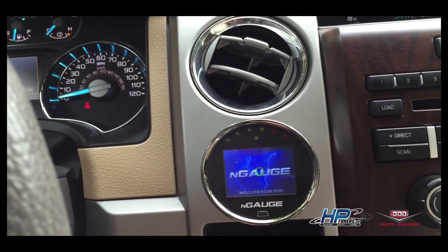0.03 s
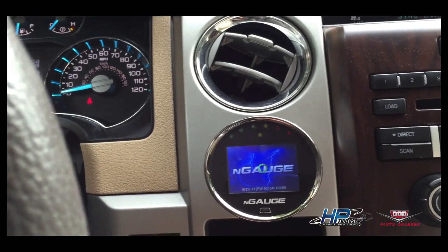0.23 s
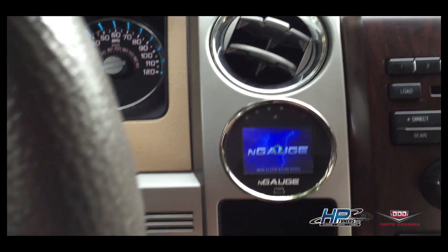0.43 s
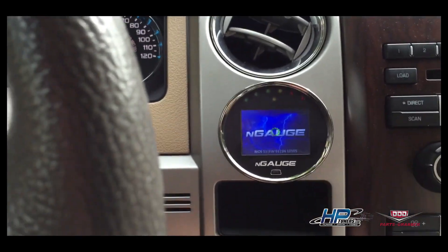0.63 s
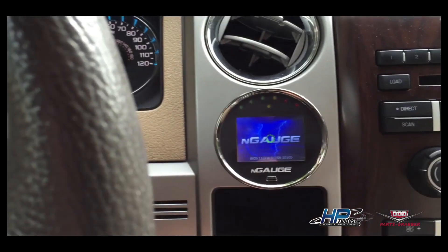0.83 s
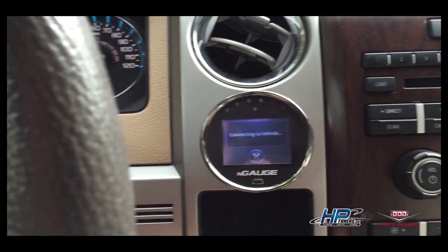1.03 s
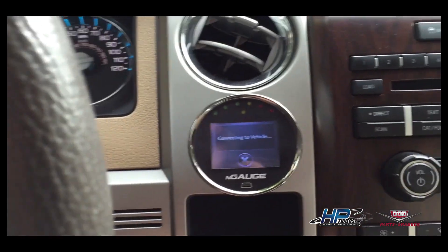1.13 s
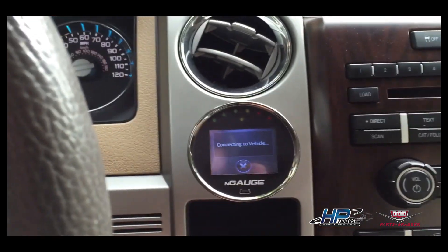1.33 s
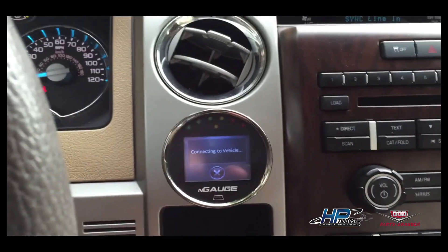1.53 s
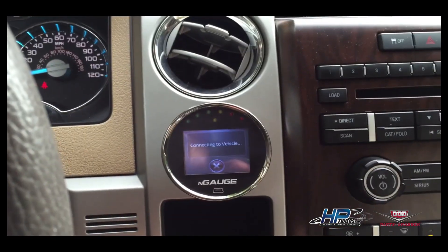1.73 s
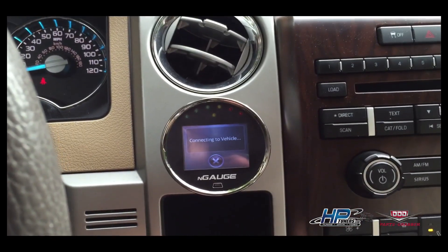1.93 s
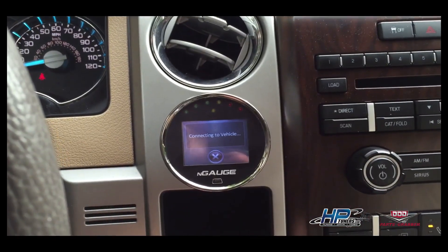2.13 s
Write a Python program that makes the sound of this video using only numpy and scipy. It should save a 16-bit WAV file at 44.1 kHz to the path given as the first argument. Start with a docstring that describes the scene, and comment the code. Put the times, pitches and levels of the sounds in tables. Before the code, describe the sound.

Gusts from a dashboard vent buffet the microphone while an engine rumbles low underneath.

```python
"""Eddies of air from a dash vent thump a microphone in uneven clusters inside a vehicle cabin.
Each passing vortex is a pressure swing of a cycle or two, and streams of smaller ones follow the gusts.
Beneath them the blower hisses and excites the resonances of its ducts, while the idling engine rumbles.
A thin mechanical whirr dies away at the start; a short rustle and a small tick come later."""
import sys
import numpy as np
from scipy import signal
from scipy.fft import rfft, irfft
from scipy.io import wavfile
from scipy.ndimage import uniform_filter1d

SR = 44100
rng = np.random.default_rng(int(sys.argv[2]) if len(sys.argv) > 2 else 0)


def generate_wav(sig):
    """Save sig (samples, or channels by samples) to the path in sys.argv[1] as 16-bit PCM at SR."""
    pcm = np.round(np.clip(np.atleast_2d(sig).T, -1, 1) * 32767).astype(np.int16)
    wavfile.write(sys.argv[1], SR, pcm)


N = 96402

# Air buffets: (time [s], main eddy level [dB], nominal length [ms], pitch [Hz], relative flutter [dB])
AIR_BUFFETS = [(0.017, -14.5, 25.7, 100, -27), (0.036, -26.5, 17.2, 173, -10.5),
               (0.054, -21, 16, 212, -9.5), (0.112, -22, 11.3, 215, -12.5), (0.13, -15, 14.2, 162, -20),
               (0.164, -19.5, 10, 200, -20), (0.18, -25, 8.8, 170, -16.5), (0.202, -16.5, 10.8, 150, -10.5),
               (0.264, -19, 13.3, 115, -28.5), (0.286, -27, 9.6, 109, -22), (0.301, -23.5, 20.8, 131, -18),
               (0.329, -27.5, 23, 100, -24), (0.347, -22, 17.7, 118, -17.5),
               (0.435, -28.5, 15.4, 149, -30.5), (0.477, -22, 12, 126, -21.5), (0.553, -32, 16, 72.4, -32),
               (0.623, -37.5, 15.8, 99, -3), (0.639, -30.5, 22, 100, -13), (0.72, -33, 23, 66.5, -35),
               (0.807, -26, 14.2, 122, -17), (0.827, -30, 26, 62, -37), (0.853, -33.5, 35.5, 111, -22),
               (0.955, -25, 16, 180, -16.5), (0.975, -16.5, 15, 174, -18.5), (0.989, -20, 33.6, 63, -15),
               (1.075, -22, 20.4, 118, -22), (1.091, -19, 13.5, 256, -15), (1.115, -22, 16.8, 140, -28),
               (1.142, -19.5, 12.4, 203, -14), (1.196, -23.5, 18.2, 106.5, -28),
               (1.373, -11.5, 8.1, 142, -23), (1.402, -23.5, 21.5, 95, -30),
               (1.438, -12.5, 14.6, 242.4, -15.5), (1.454, -20.5, 14, 210, -16),
               (1.467, -22, 46, 54.9, -31), (1.541, -31.5, 31, 155, -21), (1.563, -32.5, 23, 178, -25),
               (1.623, -19.5, 15, 244, -7), (1.645, -27, 9.3, 155, -9), (1.671, -12.5, 10.7, 250, -14.5),
               (1.678, -12.5, 6.8, 245, -15), (1.734, -29.5, 36, 138, -23), (1.768, -23.5, 19, 119, -24),
               (1.866, -18, 9.4, 148, -19), (1.896, -21.5, 26.5, 90, -13), (1.916, -20.5, 10.6, 245, -23),
               (1.984, -11, 12.4, 167, -10), (2.0, -13, 10, 199, -20.5), (2.013, -14.5, 13.5, 156, -24.5),
               (2.066, -17, 8.1, 204, -15), (2.085, -14, 22, 201.4, -10), (2.096, -17.5, 10.5, 259, -29),
               (2.111, -32, 14, 170, -15), (2.123, -13, 6.8, 246, -12.5), (2.131, -15, 10, 267.4, -8),
               (2.155, -23.5, 20, 129, -11), (2.175, -36, 51, 71, -30)]
# Gust strength in the streams of small eddies: (time [s], deep level [dB], upper level [dB])
GUST_LEVELS = [(0.0, -48.5, -29.5), (0.18, -38.5, -41), (0.33, -33.5, -34.5), (0.47, -48, -47.5),
               (0.61, -52, -46.5), (0.81, -61, -45.5), (1.01, -45, -43), (1.16, -33, -48), (1.3, -45, -47),
               (1.45, -41.5, -45.5), (1.56, -37, -37), (1.7, -29.5, -32), (1.85, -40, -41.5),
               (1.95, -33, -30.5), (2.19, -34, -34.5)]
# Broad spectrum of the blower and cabin: (frequency [Hz], relative level [dB])
BLOWER_SPECTRUM = [(25, -23.5), (60, -2), (100, -8.5), (200, -17.5), (450, -33), (600, -16.5), (1000, -23),
                   (1600, -25.5), (2200, -37), (3200, -45.5), (6000, -52.5), (9500, -56.5), (10400, -61),
                   (11300, -57.5), (15300, -60.5)]
# Duct resonances: (frequency [Hz], width [Hz], relative level [dB])
DUCT_MODES = [(630.5, 26, 4), (777, 43, -1.5), (885, 39, 3.5), (1364, 15, -4.5), (1525, 42, -10.5),
              (1596, 39, -13.5)]
# Whirr resonances: (frequency [Hz], width [Hz], relative level [dB])
WHIRR_MODES = [(2040, 60, 2), (2220, 55, 2.5), (2470, 60, -4), (3300, 500, -5.5), (3840, 200, -3),
               (4240, 45, -1.5), (4370, 35, -4.5), (4570, 120, -5)]
# Hiss above the whirr: (frequency [Hz], relative level [dB])
WHIRR_HISS = [(2000, -6), (5500, 1), (9000, -9), (15000, -8)]
# Brushes of the rustle: (start [s], rise time [s], level at the crest [dB])
RUSTLE_BRUSHES = [(0.75, 0.015, -63.5), (0.782, 0.016, -58), (0.821, 0.019, -62.5), (.935, 0.02, -70.5)]
# Spectrum of the rustle and of the tick's snap: (frequency [Hz], relative level [dB])
RUSTLE_SPECTRUM = [(1500, 3.5), (3000, 1), (5000, -5), (7500, -9), (9000, -19), (14000, -31)]
# Blips of the tick: (start [s], frequency [Hz], level [dB], length [s])
TICK_BLIPS = [(1.389, 2496, -48, 0.0069), (1.391, 3680, -64, .013)]


def buffets(attack=.61, flutter_hz=(427, 650)):
    """Turbulence spans many scales: each buffet is a main eddy, a slower, a faster and two flutters."""
    out = np.zeros(N)
    for (time, db, ms, hz, flutter_db), draw in zip(AIR_BUFFETS, rng.random((len(AIR_BUFFETS), 12))):
        width = .399 * ms / 1000  # decay width of the main eddy [s]
        peak = time - .2 * width
        push_phase = .4 * (draw[0] - .5)  # near zero, so the pressure peaks as a push
        main = eddy(hz, width, push_phase, glide=-.088 * (1 + draw[1]), attack=attack)
        slow = eddy(.48 * hz, 1.43 * width, draw[3])
        fast = eddy(1.53 * hz, .61 * width, draw[5], attack=attack)
        add(out, peak, amp(db) * main)
        add(out, peak + width * (draw[2] + .25), amp(db - 7) * slow)
        add(out, peak + width * (draw[4] - .6), amp(db - 5.5) * fast)
        for (jitter, pitch, phase), lag, step_db in zip(draw[6:].reshape(2, 3), (-.5, .4), (0, -4)):
            f = flutter_hz[0] * (flutter_hz[1] / flutter_hz[0]) ** pitch
            flutter = eddy(f, .76 / f, phase, attack=attack)
            add(out, peak + width * (lag + .4 * jitter), amp(db + flutter_db + step_db) * flutter)
    return out


def eddy(hz, width_s, phase_turns, glide=0., attack=1.):
    """A passing vortex swings the pressure about zero; attack is its ratio of rise to decay time."""
    t = np.arange(-4 * width_s, 4 * width_s, 1 / SR)
    bell = np.exp(-.5 * (t / width_s / np.where(t < 0, attack, 1)) ** 2)
    turns = hz * t * (1 + glide * np.tanh(t / width_s)) + phase_turns
    pressure = bell * np.cos(2 * np.pi * turns)
    return pressure - bell * pressure.sum() / bell.sum()


def small_eddies(band_hz, gust_column, per_second=270, spread_db=4.5, tilt_db_per_octave=1):
    """Shot noise: small vortices arrive at random, and their summed pressure follows the gusts."""
    strength = amp(spread_db * np.minimum(rng.exponential(1, N), 1.9))
    arrivals = strength * (rng.random(N) < per_second / SR)
    kind, stream = rng.integers(0, 16, N), np.zeros(N)
    for k, hz in enumerate(np.geomspace(*band_hz, 16)):
        pulse = amp(tilt_db_per_octave * np.log2(hz / band_hz[0])) * eddy(hz, .45 / hz, rng.random())
        stream += signal.oaconvolve(arrivals * (kind == k), pulse, "same")
    gusts = np.array(GUST_LEVELS)
    gust_db = np.interp(np.arange(N) / SR, gusts[:, 0], gusts[:, gust_column])
    return amp(gust_db) * unit_rms(stream)


def engine_idle(hz=58.65, width_hz=8.8, db=-41):
    """The idle rumble is a narrow noise band, which wavers as neighbouring frequencies beat."""
    return amp(db) * resonances([(hz, width_hz, 0)])


def blower(swell_db=1.5, swell_start_s=.53, swell_s=.12):
    """Broadband flow noise and the duct resonances it excites swell slightly to a steady level."""
    hiss = amp(-46.5) * coloured_noise(BLOWER_SPECTRUM, drift_db=4)
    ducts = amp(-56.5) * resonances(DUCT_MODES)
    progress = np.clip((np.arange(N) / SR - swell_start_s) / swell_s, 0, 1)
    return amp(swell_db * (progress - 1)) * (hiss + ducts)


def whirr(end_s=.21):
    """Noise-driven resonances give fuzzy metallic tones; with a faint hiss they fade ever faster."""
    fade = np.maximum(1 - (np.arange(N) / SR / end_s) ** 2, 0)
    return fade * (amp(-60.5) * resonances(WHIRR_MODES) + amp(-74.5) * coloured_noise(WHIRR_HISS))


def rustle():
    """Amplitude modulation shapes a hiss into short brushes that swell and fade."""
    envelope = sum(amp(db) * burst(start, rise) for start, rise, db in RUSTLE_BRUSHES)
    return envelope * coloured_noise(RUSTLE_SPECTRUM, drift_db=1.5)


def tick():
    """Two brief tone pulses and a broadband snap overlap so closely that the ear fuses them."""
    t, blips = np.arange(N) / SR, np.zeros(N)
    for start, hz, db, length in TICK_BLIPS:
        progress = np.clip((t - start) / length, 0, 1)
        envelope = np.sin(np.pi * progress ** .7) ** .6
        blips += amp(db) * envelope * np.sin(2 * np.pi * hz * t)
    snap = amp(-64) * burst(start_s=1.392, rise_s=.002) * coloured_noise(RUSTLE_SPECTRUM)
    return blips + snap


def coloured_noise(spectrum, drift_db=0., drift_corner_hz=2570):
    """Spectral shaping colours white noise; patches of it drift in level, less so above the corner."""
    frames, frame_hz = N // 256 + 5, np.fft.rfftfreq(1024, 1 / SR)
    real, imag, patches = rng.standard_normal((frames, 513, 3)).T
    patches = unit_rms(uniform_filter1d(uniform_filter1d(patches, 8, axis=0), 12, axis=1))
    drift = amp(drift_db * patches / (1 + (frame_hz[:, None] / drift_corner_hz) ** 2))
    noise = signal.istft((real + 1j * imag) * drift, nperseg=1024, noverlap=768)[1][:N]
    hz, db = np.transpose(spectrum)
    gain = amp(np.interp(np.log(np.fft.rfftfreq(N, 1 / SR) + 1), np.log(hz), db))
    return unit_rms(irfft(rfft(noise) * gain, N))


def resonances(modes):
    """Under random forcing, each mode passes a bell-shaped band of noise around its frequency."""
    hz = np.fft.rfftfreq(N, 1 / SR)
    gain = sum(amp(db) / np.sqrt(width) / (1 + ((hz - f) / (width / 2)) ** 2) for f, width, db in modes)
    return unit_rms(irfft(rfft(rng.standard_normal(N)) * gain, N))


def burst(start_s, rise_s):
    """A critically damped envelope rises to one and decays."""
    age = np.maximum(np.arange(N) / SR - start_s, 0) / rise_s
    return age * np.exp(1 - age)


def amp(db):
    """Amplitude grows tenfold every 20 dB."""
    return 10 ** (np.asarray(db) / 20)


def unit_rms(x):
    """Division by the RMS value gives unit power."""
    return x / np.sqrt(np.mean(x ** 2) + 1e-20)


def add(mix, centre_s, sound):
    """Superposes a sound on the mix, centred on the given time."""
    at = round(centre_s * SR) - len(sound) // 2 + np.arange(len(sound))
    inside = (at >= 0) & (at < N)
    mix[at[inside]] += sound[inside]


def scene():
    """Pressures superpose: the low-passed vent air and the cabin's sounds sum to one channel."""
    air = buffets()
    air += small_eddies(band_hz=(46.5, 100), gust_column=1)
    air += small_eddies(band_hz=(100, 334), gust_column=2)
    air = signal.sosfilt(signal.butter(3, 1380, fs=SR, output="sos"), air)
    return (air + engine_idle() + blower() + whirr() + rustle() + tick())[None]


def record(dry, bass_hz=43, top_hz=15330, fade_s=.004):
    """The small microphone acts as a band-pass filter; a brief fade softens the end."""
    x = signal.sosfilt(signal.butter(3, bass_hz, "high", fs=SR, output="sos"), dry)
    fade = np.minimum(np.arange(N)[::-1] / (fade_s * SR), 1)
    band_limit = signal.firwin(1501, top_hz, window=("kaiser", 9), fs=SR)
    return signal.oaconvolve(x * fade, band_limit[None], "same")


dry = scene()
out = record(dry)
generate_wav(out)
```